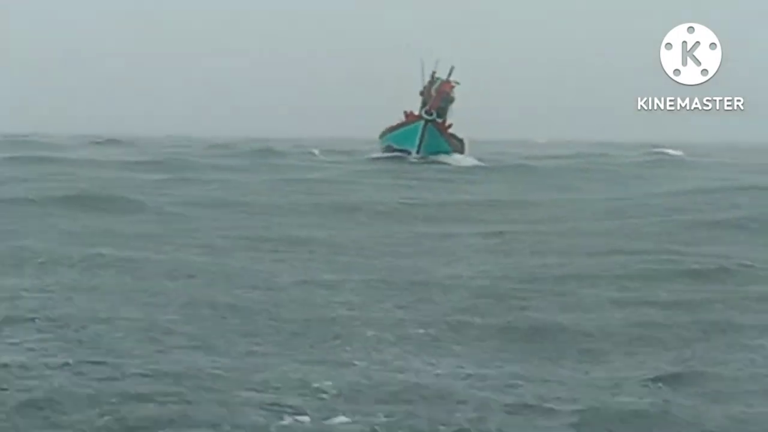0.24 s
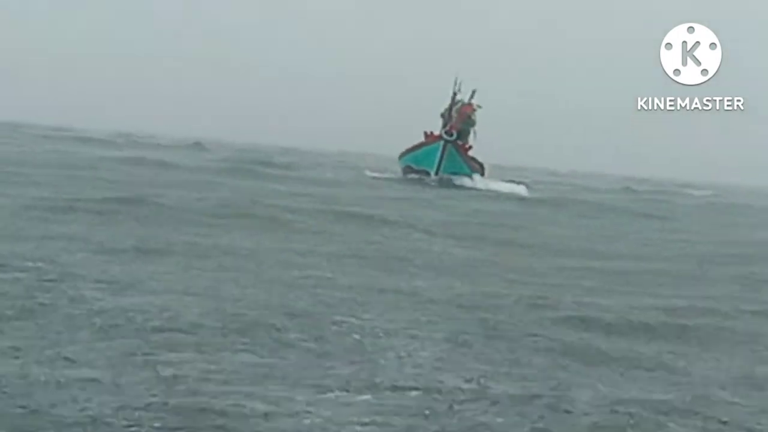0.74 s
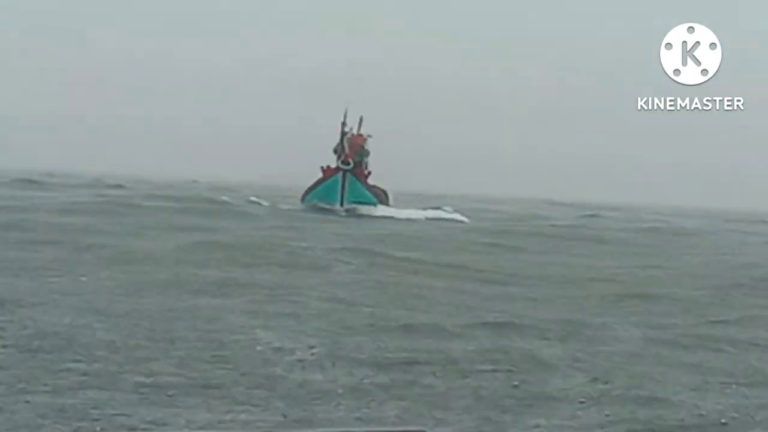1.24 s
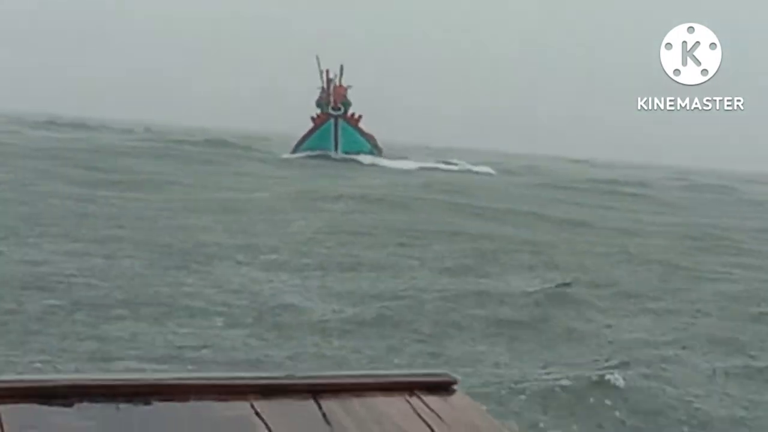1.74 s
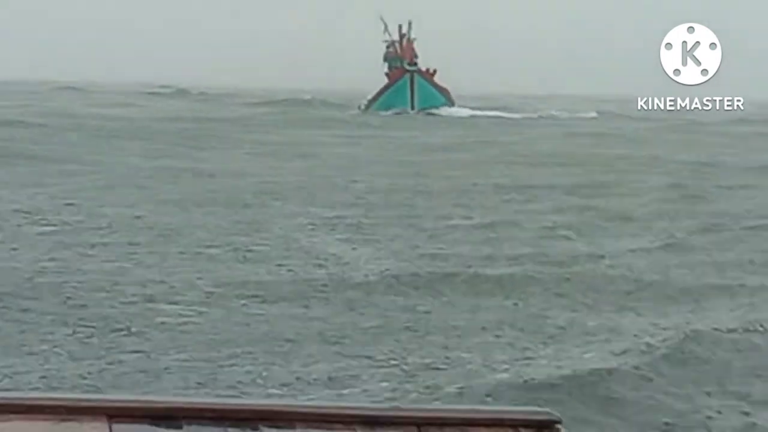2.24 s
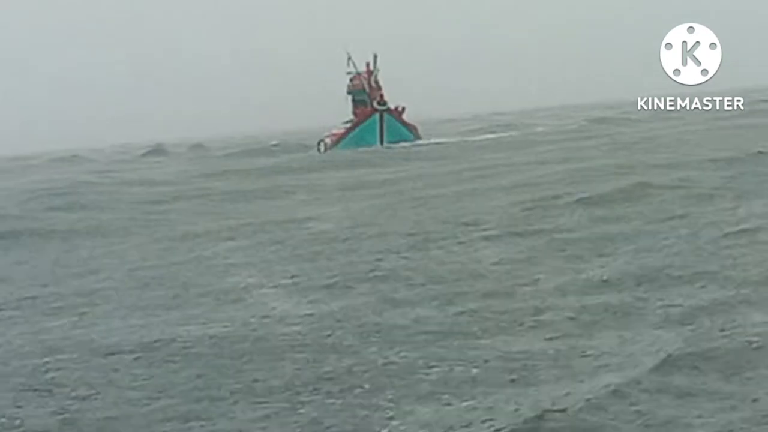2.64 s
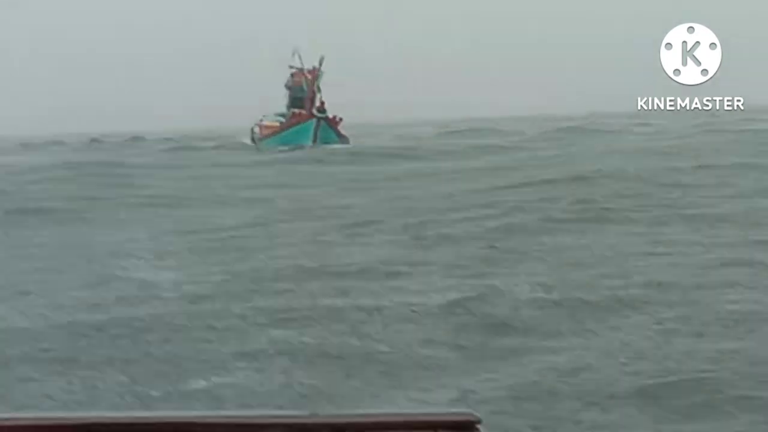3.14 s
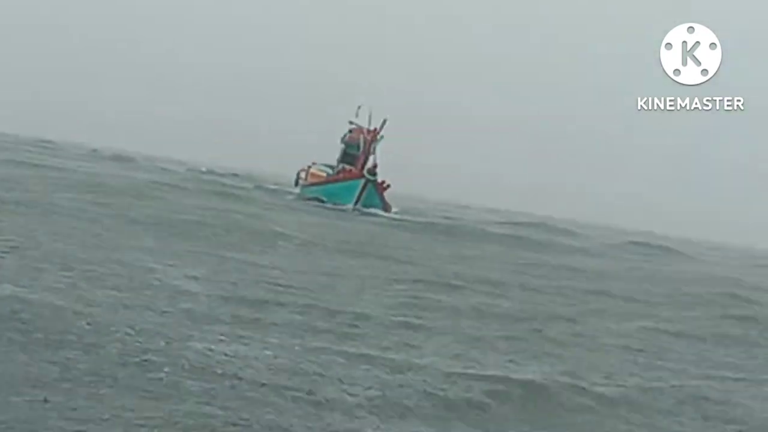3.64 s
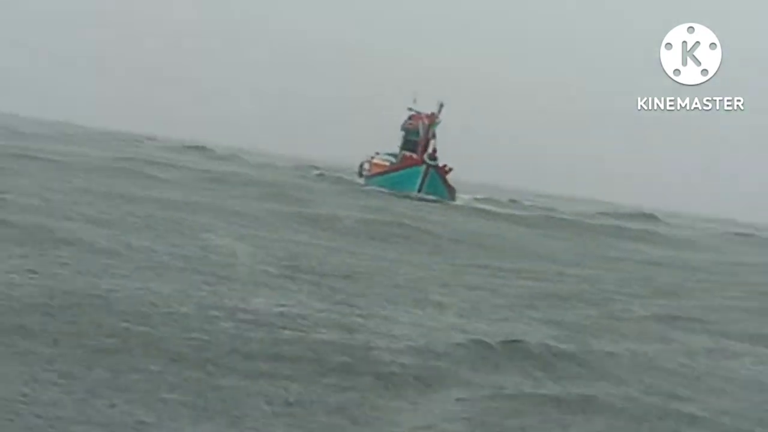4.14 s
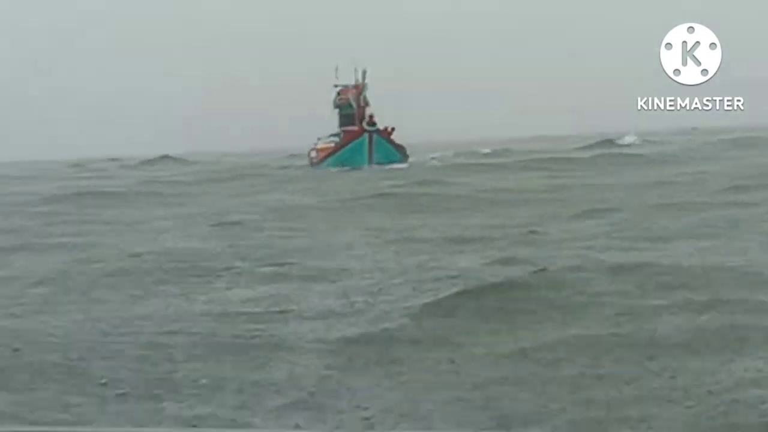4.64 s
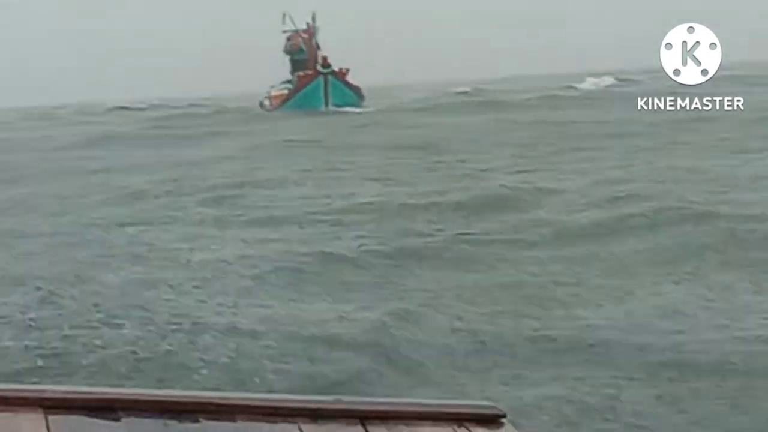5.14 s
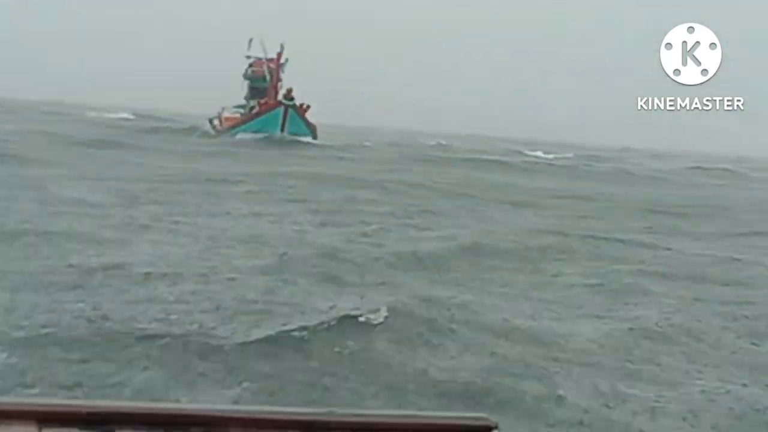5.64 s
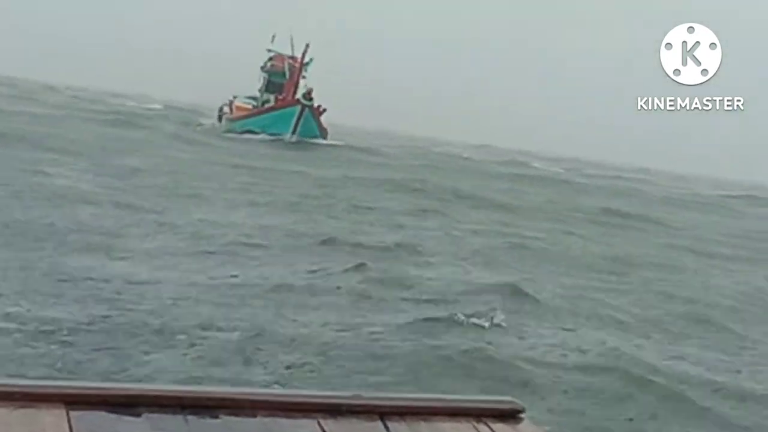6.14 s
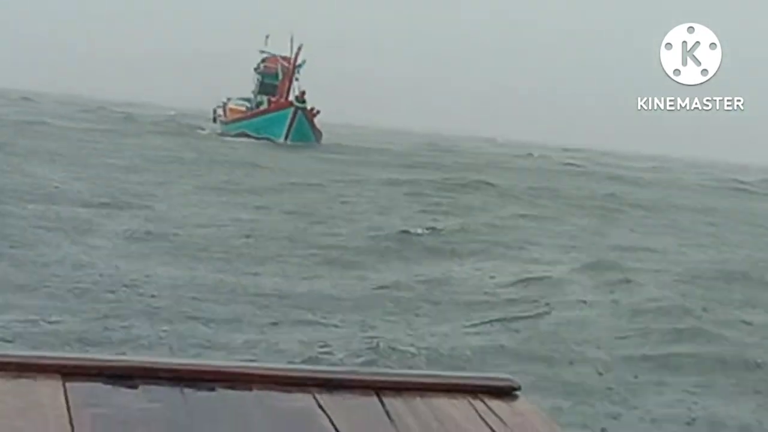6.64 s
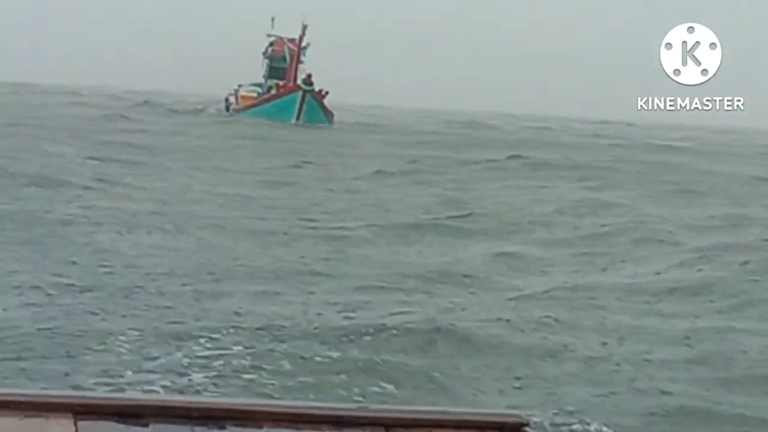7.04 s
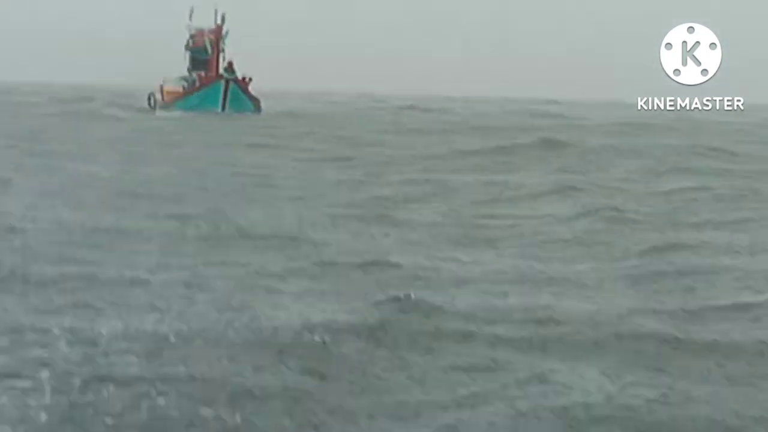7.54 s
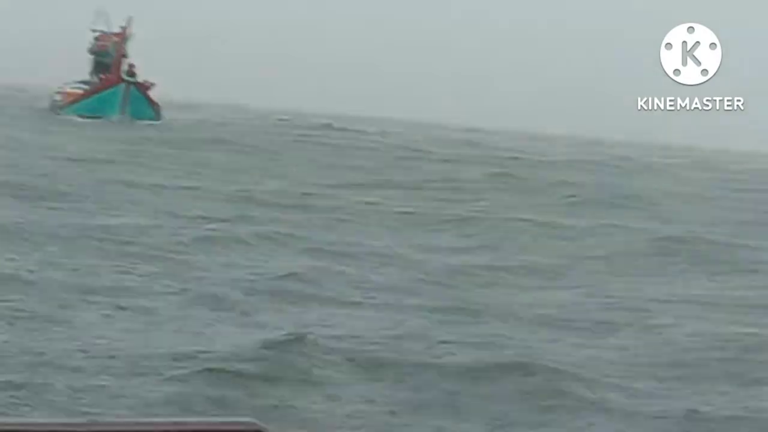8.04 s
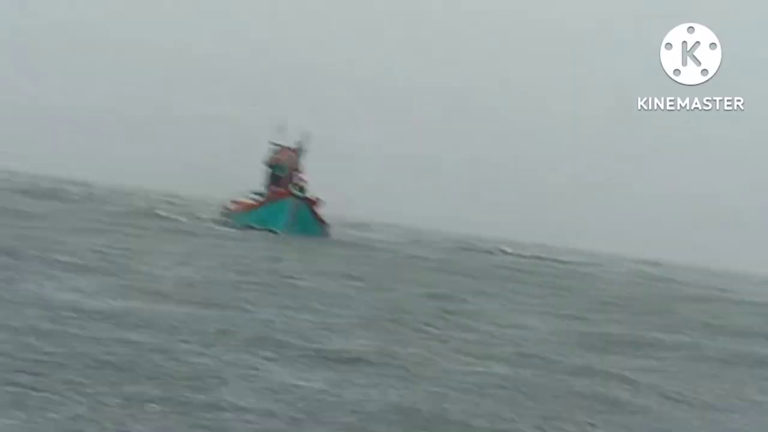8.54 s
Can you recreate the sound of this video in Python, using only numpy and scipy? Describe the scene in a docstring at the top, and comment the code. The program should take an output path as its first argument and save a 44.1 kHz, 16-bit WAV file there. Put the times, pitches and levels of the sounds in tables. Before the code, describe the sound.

A single-cylinder diesel engine drives a small wooden boat at sea, chugging evenly at nearly eight beats a second. Each beat has a hard metallic knock, a clatter of loose parts and a low exhaust thud, with an occasional louder clank. A low hum and a steady wash of water lie underneath. It runs unchanged throughout, heard from the deck on a small microphone.

```python
"""A slow single-cylinder diesel, firing about 7.7 times a second, drives a small wooden boat at sea.
Heard from the deck on one small microphone: each combustion knocks the block and covers into ringing,
and slack parts clatter after it. The exhaust thuds and puffs, then the intake hums and a valve ticks.
Behind the engine, running gear and water make a steady wash."""
import sys
import numpy as np
from scipy import signal
from scipy.fft import rfft, irfft, next_fast_len
from scipy.io import wavfile

SR = 44100
rng = np.random.default_rng(int(sys.argv[2]) if len(sys.argv) > 2 else 0)


def transcribe(signal):
    """Save signal, clipped to [-1, 1], as a 16-bit WAV file at the path in sys.argv[1]."""
    frames = np.atleast_2d(signal).T
    limited = np.clip(frames, -1, 1)
    pcm = np.round(limited * 32767).astype(np.int16)
    wavfile.write(sys.argv[1], SR, pcm)


N = 387638
TIME = np.arange(N) / SR

# how hard the combustion knocks: (time [s], level [dB])
KNOCK_HARDNESS = [(0, -0.3), (.7, -2), (1.3, 1.5), (1.75, -1), (2.2, 0.1), (3.1, -0.3), (4.15, 3),
                  (5.4, -0.9), (6.2, -0.1), (7.3, 0.2), (8.7, -0.7)]
KNOCK_SPREAD_DB = 0.97   # from one firing to the next
REBOUND_S, REBOUND_DB = .0225, -9.0


def knock():
    """Combustion hammers the engine; its loudest parts ring again, softer and duller, on the rebound."""
    hardness_db = at_firings(KNOCK_HARDNESS)
    knock_db = hardness_db + KNOCK_SPREAD_DB * rng.standard_normal(len(hardness_db))
    blow = block_and_covers(knock_db) + crack(knock_db)
    rings = sum(ringing(part, knock_db) for part in PART_RINGS)
    rebound = from_db(REBOUND_DB) * delayed(low_pass(rings, hz=1800), REBOUND_S)
    return blow + rings + rebound


# heavy modes of the engine block: (frequency [Hz], width [Hz], level [dB])
BLOCK_MODES = [(453, 35, -5), (531, 55, -1.5), (709, 29, -5.5), (940.5, 35, -4), (1051, 45, -6),
               (1174, 54, -1), (1269, 38, -4.5), (1378, 37, -10.5), (1565, 24, -7.5)]
# lighter modes of its covers: (frequency [Hz], width [Hz], level [dB])
COVER_MODES = [(1674, 59, -8), (1788, 28, 0), (1895, 49, -7), (2067, 27, -2), (2188, 40, -7),
               (2404, 49, -9.5), (2548, 30, -7.5), (2850, 80, -12.5), (2962, 45, -10), (3180, 78, -10),
               (3395, 38, -18), (3571, 38, -11.5), (4000, 37, -22), (5150, 32, -33.5), (5815, 80, -27),
               (5884, 57, -26), (6300, 63, -33)]


def block_and_covers(knock_db):
    """The light covers answer each blow at once, the heavy block a little later."""
    heavy = stroke(delay_ms=2.5, rise_ms=3.0, t60=0.038, level_db=knock_db / 2 + 3.0, scatter_db=0.0)
    block = resonate(heavy * contacts(per_s=4000), BLOCK_MODES)
    sharp = stroke(delay_ms=0.91, rise_ms=1.42, t60=0.048, level_db=knock_db + 3.0, scatter_db=1.6)
    covers = resonate(sharp * contacts(per_s=4400), COVER_MODES)
    return block + covers


def clatter():
    """After each blow, slack parts fall back against the block and shake the covers."""
    fall = stroke(delay_ms=15.9, rise_ms=6.5, t60=0.069, level_db=1.0, scatter_db=1.0)
    touches = fall * contacts(per_s=2200)
    covers = from_db(-4.5) * resonate(low_pass(touches, hz=2740), COVER_MODES)
    return resonate(touches, BLOCK_MODES) + covers


# the combustion crack, including the recorder's 8 kHz notch and dull top: (frequency [Hz], level [dB])
CRACK_SPECTRUM = [(60, -23.5), (300, -4), (410, -10.5), (1500, -16), (3500, -20.5), (4400, -31),
                  (5900, -30), (6800, -34), (7300, -46), (8000, -62), (9500, -47), (13000, -66),
                  (15000, -53.5)]


def crack(knock_db):
    """Each firing gives a burst of broad noise, which echoes in the engine box."""
    burst = stroke(delay_ms=0.65, rise_ms=2.1, t60=0.099, level_db=knock_db + 1.3, scatter_db=1.5)
    return burst * engine_box(noise(CRACK_SPECTRUM))


# the loudest ringing parts: part -> (delay [ms], frequency [Hz], level [dB], rise [ms], t60 [s])
PART_RINGS = {"case": (1.47, 503, -10.8, 2.5, 0.0527), "head": (2.04, 962, -11.5, 2.9, 0.05),
              "block": (3.47, 1238, -5.6, 4, 0.0451), "cover": (1.5, 2429.5, -19, 2.5, 0.06)}
# soft blows favour the case, hard ones the cover: part -> ring level per knock level [dB/dB]
RING_PER_KNOCK = {"case": -.6, "head": -.2, "block": .2, "cover": 1.9}
# blows that land squarely on one part: (time [s], part, level above its usual ring [dB])
SQUARE_HITS = [(.485, "head", 9), (.747, "head", 11), (1.272, "cover", 5), (1.535, "case", 7.5),
               (1.928, "block", 6), (2.189, "block", 8), (2.45, "cover", 7.5), (2.581, "block", 6.5),
               (3.102, "head", 9.5), (3.363, "cover", 6.5), (4.154, "cover", 7), (4.809, "block", 7),
               (5.199, "block", 7), (6.112, "block", 7), (6.243, "block", 7), (7.677, "head", 9),
               (7.938, "case", 7.5), (8.199, "case", 8)]
SHARE_RANGE_DB = 5.5   # an ordinary blow gives a part up to this much more or less


def ringing(part, knock_db):
    """One part rings with a chance share of each blow, and clanks when it is hit squarely."""
    fired = firing_times()
    share_db = SHARE_RANGE_DB * rng.uniform(-1, 1, len(fired))
    for time_s, struck, db in SQUARE_HITS:
        if struck == part:
            share_db[np.argmin(abs(fired - time_s))] = db
    ring_db = RING_PER_KNOCK[part] * knock_db + share_db - 0.6
    return tones([PART_RINGS[part]], level_db=ring_db, scatter_db=0.1, jitter_ms=.6)


# pipe and hull resonances: (delay after firing [ms], frequency [Hz], level [dB], rise [ms], t60 [s])
THUD_MODES = [(-0.97, 198.8, -22.5, 24, 0.34), (.1, 82.2, -14.5, 6.3, .26), (7, 59.1, -28.5, 1.3, .22),
              (11.5, 255, -14, 2.0, 0.11), (34, 133.3, -7, 24, .3), (40, 143.2, -17.5, 8.0, 0.32),
              (45, 236, -15.5, 1.4, 0.075)]
# the exhaust puff, including the recorder's 8 kHz notch and dull top: (frequency [Hz], level [dB])
PUFF_SPECTRUM = [(50, -12), (110, -10.5), (450, -14.5), (1100, -22), (2200, -27), (3300, -40.5),
                 (4300, -33.5), (5600, -28), (6300, -39.5), (7000, -54.5), (8000, -69), (9500, -67),
                 (13000, -81)]
# modes of the silencer shell: (frequency [Hz], width [Hz], level [dB])
SILENCER_MODES = [(1309, 40, -1.5), (1597, 35, -9), (2021, 31, -6), (2220, 34, -10.5)]


def exhaust():
    """Pipe and hull give a low thud, then gas hisses out and rings the silencer shell."""
    flow = stroke(delay_ms=52.1, rise_ms=8.8, t60=0.1, level_db=0.36, scatter_db=0.56)
    shell_force = stroke(delay_ms=44.6, rise_ms=8.8, t60=0.18, level_db=-1.5, scatter_db=1.5)
    thud = tones(THUD_MODES, level_db=1.14, scatter_db=0.3, jitter_ms=0.063)
    puff = flow * engine_box(noise(PUFF_SPECTRUM))
    shell = resonate(shell_force * contacts(per_s=3600), SILENCER_MODES)
    return thud + puff + shell


# air pipe resonances: (delay after firing [ms], frequency [Hz], level [dB], rise [ms], t60 [s])
HUM_MODES = [(82.93, 131.9, -15.5, 1.7, 0.26), (82.51, 260.5, -0.23, 10.3, 0.12),
             (108.65, 257, -14, 4.5, .12)]
# slow drift of the hum heard on deck: (time [s], level [dB])
HUM_LEVEL = [(0, .3), (1.5, .4), (2.3, -.8), (2.8, .7), (4.2, -0.1), (4.9, 1.2), (5.8, 1), (6.2, -1.1),
             (7.25, -1.5), (7.45, 1), (8.7, 0)]
# modes of the valve gear: (frequency [Hz], width [Hz], level [dB])
VALVE_MODES = [(377, 56, -7), (512, 35, -6.5), (688, 45, -7), (760, 37, -9), (857, 38, -4.5),
               (1300, 48, -4.5)]
# modes of the valve spring: (frequency [Hz], width [Hz], level [dB])
SPRING_MODES = [(7086, 42, -27), (7200, 81, -37.5)]


def intake():
    """The air pipe hums as the piston draws; the valve seats with a tick and its spring sings."""
    seat_force = stroke(delay_ms=97.8, rise_ms=4.4, t60=0.19, level_db=.5, scatter_db=1.05)
    spring_force = stroke(delay_ms=101.3, rise_ms=2.5, t60=0.089, level_db=-1.0, scatter_db=2.5)
    hum = tones(HUM_MODES, level_db=at_firings(HUM_LEVEL) + 0.1, scatter_db=0.65, jitter_ms=0.26)
    tick = resonate(seat_force * contacts(per_s=3000), VALVE_MODES)
    spring = resonate(spring_force * contacts(per_s=4400), SPRING_MODES)
    return hum + tick + spring


# the engine's pace drifts a little as the boat rides the swell: (time [s], cycle length [ms])
CYCLE_LENGTH = [(0.0, 130.25), (1.4, 131.67), (1.6, 130.14), (1.8, 131.23), (2.8, 129.86), (3.4, 131.55),
                (3.999, 132.0), (5.2, 129.4), (5.6, 130.77), (6.0, 131.02), (6.399, 130.58), (7.6, 130.03),
                (8.6, 131.59)]
FIRST_FIRING_S = -.0362


def firing_times():
    """Each firing follows the one before by the length of a cycle."""
    time_s, cycle_ms = np.transpose(CYCLE_LENGTH)
    fired = [FIRST_FIRING_S]
    while fired[-1] < N / SR:
        fired.append(fired[-1] + np.interp(fired[-1], time_s, cycle_ms) / 1000)
    return np.array(fired[:-1])


def at_firings(curve):
    """The value of a slow curve at each firing."""
    return np.interp(firing_times(), *np.transpose(curve))


def each_cycle(shape, delay_ms, level_db, scatter_db):
    """Repeats a shape at one crank angle, so later when the engine slows, with scatter in its strength."""
    fired = firing_times()
    period = np.gradient(fired)
    starts = fired + delay_ms / 1000 * period / period.mean()
    gains = from_db(level_db + scatter_db * rng.uniform(-2, 2, len(starts)))
    out = np.zeros(N + 2 * SR)   # a spare second at each end
    for start, gain in zip(starts, gains):
        at = SR + round(start * SR)
        out[at:at + len(shape)] += gain * shape
    return out[SR:SR + N]


def envelope(rise_ms, t60):
    """One stroke builds up softly and dies away, by 60 dB in t60 seconds."""
    age = TIME[:SR // 2]
    attack = (1 - np.exp(-age / (rise_ms / 1000))) ** 2
    return attack * from_db(-60 * age / t60)


def stroke(delay_ms, rise_ms, t60, level_db, scatter_db):
    """The force of a stroke that comes back in every cycle."""
    shape = envelope(rise_ms, t60)
    return each_cycle(shape / shape.max(), delay_ms, level_db, scatter_db)


def tones(modes, level_db, scatter_db, jitter_ms):
    """Resonances set swinging once a cycle, all together a little early or late."""
    out = np.zeros(N)
    late_ms = jitter_ms * rng.standard_normal(len(firing_times()))
    for delay_ms, hz, db, rise_ms, t60 in modes:
        shape = envelope(rise_ms, t60)
        ring = shape * np.sin(2 * np.pi * hz * TIME[:len(shape)])
        out -= each_cycle(ring, delay_ms + late_ms, db + level_db, scatter_db)
    return out


def contacts(per_s):
    """Metal parts touching at random moments; rms 1."""
    touching = rng.random(N) < per_s / SR
    return touching * rng.choice([-1, 1], N) * np.sqrt(SR / per_s)


def resonate(force, modes):
    """Parallel resonances with alternating signs; the body passes little far outside its own range."""
    out = np.zeros(N)
    for k, (hz, width, db) in enumerate(modes):
        radius = np.exp(-np.pi * width / SR)
        poles = [1, -2 * radius * np.cos(2 * np.pi * hz / SR), radius ** 2]
        ring = (1 - radius ** 2) / 2 * signal.lfilter([1, 0, -1], poles, force + 1e-18)
        out += (-1) ** k * from_db(db) * ring
    edges_hz = [modes[0][0] / 1.3, modes[-1][0] * 1.08]
    return signal.sosfilt(signal.butter(6, edges_hz, "band", fs=SR, output="sos"), out)


# reflections off the walls close around the engine: (delay [ms], gain [ratio])
BOX_ECHOES = [(2.3, .3), (3.9, -.3), (6.1, .25)]


def engine_box(x):
    """Close wooden walls add a few echoes, which make the hiss hollow."""
    echoes = sum(gain * delayed(x, delay_ms / 1000) for delay_ms, gain in BOX_ECHOES)
    power = 1 + sum(gain ** 2 for _, gain in BOX_ECHOES)
    return (x + echoes) / np.sqrt(power)


# the background on deck, with the same notch and dull top: (frequency [Hz], level [dB])
WASH_SPECTRUM = [(20, -28), (45, -23), (85, -14.5), (180, -14), (280, -11.5), (420, -17), (1300, -18.5),
                 (2800, -24), (4400, -37), (5700, -37), (6300, -53), (8000, -69), (9500, -63.5),
                 (14000, -77.5)]


def wash():
    """Running gear and the water around the boat blend into a steady noise."""
    return noise(WASH_SPECTRUM)


def noise(spectrum):
    """Noise with the given gain at each frequency."""
    hz, db = np.transpose(spectrum)
    size = next_fast_len(N)
    bin_hz = np.maximum(np.arange(size // 2 + 1) * SR / size, 1)
    gains = from_db(np.interp(np.log(bin_hz), np.log(hz), db))
    return irfft(rfft(rng.standard_normal(size)) * gains, size)[:N]


def low_pass(x, hz):
    """Dulls a sound above the given frequency."""
    return signal.sosfilt(signal.butter(2, hz, fs=SR, output="sos"), x)


def delayed(x, seconds):
    """The same sound arriving later."""
    return np.interp(TIME - seconds, TIME, x, left=0)


def from_db(db):
    """Decibels to gain."""
    return 10 ** (np.asarray(db) / 20)


def scene():
    """From one spot on deck, in mono: the four-stroke engine over the steady wash."""
    return (knock() + clatter() + exhaust() + intake() + wash())[None]


LOW_CUT_HZ, HIGH_CUT_HZ = 45, 15700


def record(dry):
    """The small microphone on deck loses the deepest bass and rounds the peaks; the top is cut."""
    thin = signal.sosfilt(signal.butter(4, LOW_CUT_HZ, "high", fs=SR, output="sos"), dry)
    rounded = 1.601 * np.tanh(thin / 1.589)
    return signal.sosfilt(signal.ellip(10, .1, 80, HIGH_CUT_HZ, fs=SR, output="sos"), rounded)


dry = scene()
out = record(dry)
transcribe(out)
```